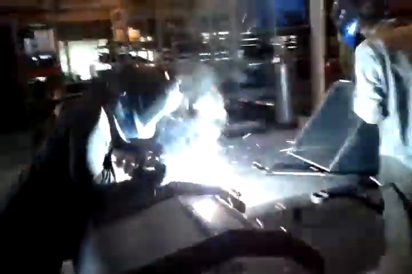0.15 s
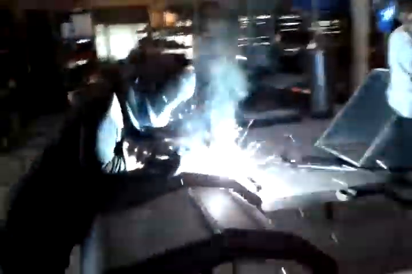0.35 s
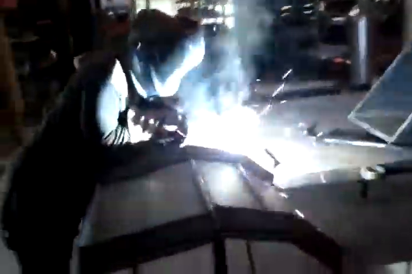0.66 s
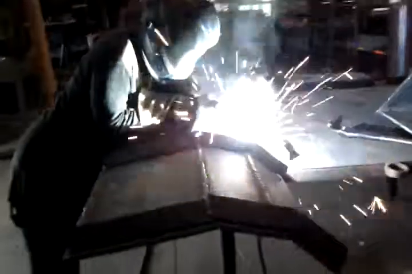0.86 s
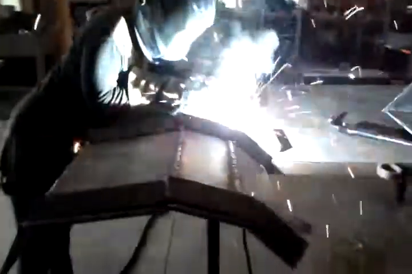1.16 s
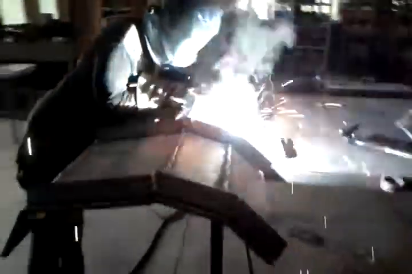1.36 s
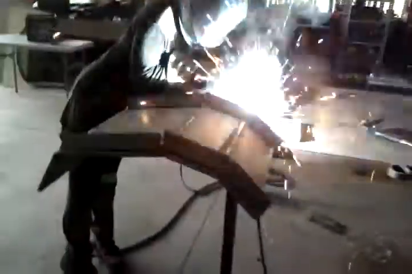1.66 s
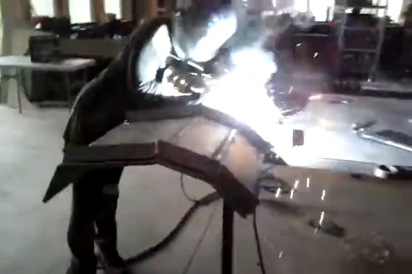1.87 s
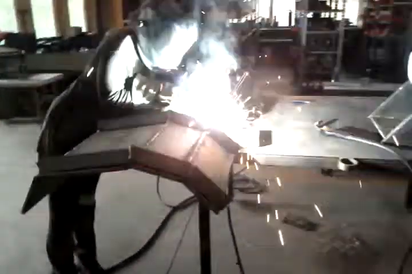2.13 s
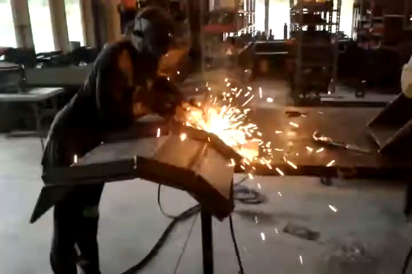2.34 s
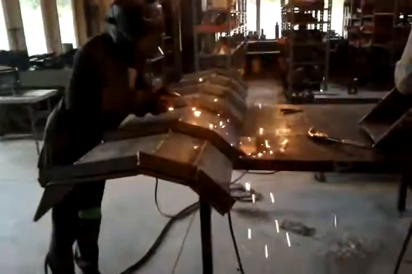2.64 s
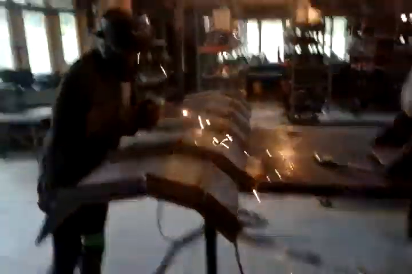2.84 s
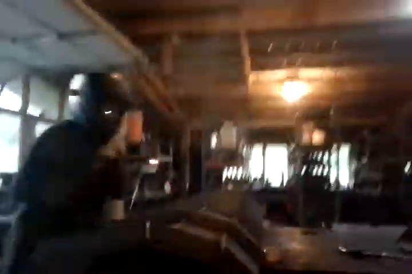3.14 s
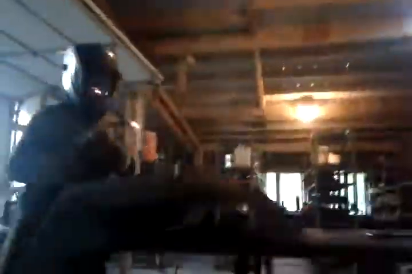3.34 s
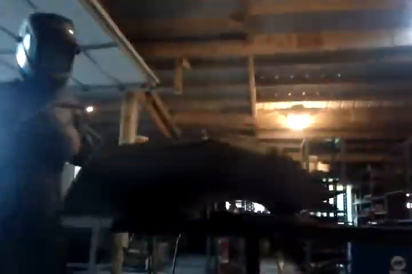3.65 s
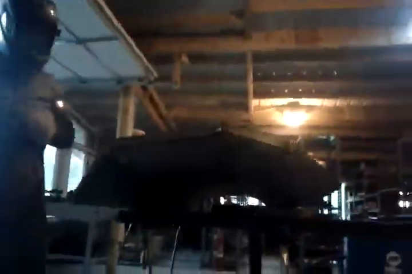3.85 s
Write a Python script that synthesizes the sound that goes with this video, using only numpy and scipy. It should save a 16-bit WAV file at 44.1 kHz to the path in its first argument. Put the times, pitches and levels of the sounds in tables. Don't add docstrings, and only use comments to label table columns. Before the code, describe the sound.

Electric arc welding crackles and pops harshly in a big workshop, then dies into faint hum

```python
import sys
import numpy as np
from scipy import signal
from scipy.io import wavfile
from scipy.ndimage import uniform_filter1d

SR = 44100
rng = np.random.default_rng(int(sys.argv[2]) if len(sys.argv) > 2 else 0)


def file_out(sig):
    cols = np.atleast_2d(sig).T
    lim = np.clip(cols, -1, 1)
    pcm = np.round(lim * 32767).astype(np.int16)
    wavfile.write(sys.argv[1], SR, pcm)


def level_to_linear(level):
    exponent = np.asarray(level, float) / 20
    return 10 ** exponent


N = 176400
EDGE_HZ = 6900
DIRECT_DB = -5


def burning(t):
    # start_s, length_s, start_level_db, end_level_db
    burns = [(-.5, 0.69, -11.5, -9), (.215, 0.05, -6, -12), (0.425, 0.058, -8, -15.5),
             (0.491, .03, -10, -12), (0.503, .047, -12.5, -11.5), (0.624, 0.019, -15, -12.5),
             (.733, 0.034, -11.5, -21.5), (0.791, 0.035, -42, -18), (0.842, 0.0094, -23, 4),
             (0.857, .04, -11.5, -14.5), (0.91, .13, -8.5, -10), (1.063, .22, -8, -8.5),
             (1.294, 0.092, -6.5, -11), (1.411, 0.02, -24, 6), (1.436, .19, -8, -10),
             (1.622, .195, -5, -11), (1.85, 0.21, -7.5, -10), (2.063, 0.04, -19, -7),
             (2.108, 0.065, -6.5, -13), (2.169, 0.054, -5.5, -10.5), (2.277, 0.016, -15, -13.5),
             (2.294, 0.027, -21.5, -36.5)]
    envelope = np.zeros(len(t))
    for start, length, db, end_db in burns:
        u = (t - start) / length
        spell = level_to_linear(db + (end_db - db) * np.clip(u, 0, 1)) * (u > 0) * (u < 1)
        envelope = np.maximum(envelope, spell)
    return envelope


def popping(t):
    # start_s, peak_db
    pops = [(0.2139, 5.5), (0.3471, -1), (0.3794, -6), (0.4181, 7), (0.479, -3.5), (0.6384, -7.5),
            (0.7342, -4.5), (0.8046, 2), (0.842, -4), (0.8575, 7), (0.9059, 6), (1.0494, 8.5),
            (1.2984, 2.5), (1.4064, 7), (1.441, -11), (1.455, -23), (2.2754, -11.5), (2.3069, 6.5)]
    gain_db, t60_s = -3, 0.018
    envelope = np.zeros(len(t))
    for start, db in pops:
        envelope += level_to_linear(db + gain_db - 60 * np.clip(t - start, 0, 1) / t60_s) * (t > start)
    return envelope


def arc_colour(dry):
    # frequency_hz, level_db (per Hz)
    arc_spectrum = [(18, -76), (30, -39.5), (516, -9.5), (619, -8), (813, -4.5), (1200, -5.5), (3910, 1),
                    (6300, 2.5), (6900, 0), (8970, -51.5), (15200, -120)]
    # frequency_hz, width_hz, level_db (the level is not used)
    plate_rings = [(887, 83, -7), (1640, 130, -3), (3850, 400, 0), (4650, 3900, 0)]
    ring_share = 0.36

    def response_db(hz):
        rings = sum(3.6 / (1 + ((hz - f) / (w / 2)) ** 2) for f, w, _ in plate_rings)
        return read(arc_spectrum, hz) + ring_share * rings

    return colour(dry, response_db)


def arc_body(dry, t):
    # time_s, body_db
    body = [(0, 0), (.22, -2), (.28, -4.5), (.55, -0.5), (.62, 1.5), (.83, 0), (.88, 4.5), (1.05, -1),
            (1.5, 0.5), (1.6, 2.5), (2.05, 1.5), (2.35, 3.5)]
    body_db = np.interp(t, *np.transpose(body))
    low = signal.sosfilt(signal.butter(2, 1370, fs=SR, output="sos"), dry)
    whistle = signal.lfilter(*signal.iirpeak(4700, 7.8, fs=SR), dry)
    varied = dry + (level_to_linear(body_db) - 1) * low + np.clip(-0.3 * body_db, 0, 3) * whistle
    drone = signal.lfilter(*signal.iirpeak(1776, 4.5, fs=SR), varied)
    return varied + np.clip(0.2044 * (body_db + 1.5), 0, 3) * drone


def arc():
    lead = 22050
    t = (np.arange(N + lead) - lead) / SR
    flutter_db, sparks_per_s, spark_spread_db = 0.5, 2500, 3
    stray_db, strays_per_s, out_s = -24.5, 90, 2.35
    flutter = uniform_filter1d(rng.standard_normal(len(t)), size=300)
    flutter = evened(uniform_filter1d(flutter, size=300))
    burn = uniform_filter1d(burning(t), size=60) * level_to_linear(flutter_db * flutter)
    drive = burn * sparks(len(t), sparks_per_s, spark_spread_db)
    drive = drive + popping(t) * sparks(len(t), 14000, 2.6)
    drive = drive + level_to_linear(stray_db) * (t < out_s) * sparks(len(t), strays_per_s, 2.7)
    dry = arc_body(arc_colour(drive), t)
    return (level_to_linear(DIRECT_DB) * dry + level_to_linear(-3.5) * hall(dry))[lead:]


def seam():
    # start_s, rise_s, hold_s, level_db
    fizzes = [
        (2.764, 0.043, 0.024, -33.5),
        (2.885, .008, .015, -34.5),
        (3.133, 0.00065, 0.0036, -30.5),
        (3.135, 0.0071, 0.042, -33),
        (3.227, .02, .08, -44.5),
        (3.545, 0.051, 0.12, -45.5),
        (3.747, 0.053, 0.048, -33),
    ]
    # frequency_hz, level_db (per Hz)
    fizz_spectrum = [(180, -21), (300, -8), (360, -22), (742, -17), (927, -10.5), (4300, -0.5), (6900, -5),
                     (8970, -36.5), (15200, -120)]
    hall_db, hall_lift_db = -12.5, 4
    t, shape = np.arange(N) / SR, np.zeros(N)
    for start, rise, hold, db in fizzes:
        fall_s = np.maximum(t - start - rise - hold, 0)
        shape += level_to_linear(db - 240 * fall_s) * np.clip((t - start) / rise, 0, 1) ** 2
    dry = colour(shape * sparks(N, 5000, 0.88), lambda hz: read(fizz_spectrum, hz))
    return level_to_linear(DIRECT_DB) * dry + level_to_linear(hall_db + hall_lift_db) * hall(dry, slower=1.22)


def hall(x, slower=1):
    # frequency_hz, t60_s
    reverberation = [(120, 1.7), (300, 1.58), (550, 0.93), (1040, 0.72), (1800, 0.82), (2600, 0.81),
                     (4000, 0.76), (6500, 0.6)]
    taps = np.zeros((8, SR))
    at = np.arange(200, SR - 20, 20) + rng.integers(0, 20, (8, (SR - 201) // 20))
    np.put_along_axis(taps, at, rng.choice([-1., 1.], at.shape), 1)
    hz, t, z = signal.stft(taps, SR, nperseg=256)
    decay = level_to_linear(-60 * t / slower / read(reverberation, hz)[:, None])
    tails = signal.istft(z * decay, SR, nperseg=256)[1]
    away = (np.arange(len(x)) * 9 / SR - np.arange(8)[:, None]) % 8 - 1
    feeds = x * np.cos(np.pi / 2 * np.clip(away, -1, 1))
    echoes = signal.fftconvolve(feeds, tails / np.linalg.norm(tails[0]), axes=1)
    return echoes[:, :len(x)].sum(0)


def room_air():
    # frequency_hz, level_db (per Hz)
    air_spectrum = [(18, -61), (30, -11.5), (70, -39), (112, -12), (177, -5.5), (249, -9), (932, -8.5),
                    (5250, -10), (6900, -11), (8970, -41), (15200, -120)]
    frames, hz = N // 256 + 5, np.fft.rfftfreq(1024, 1 / SR)
    a, b, patches = rng.standard_normal((frames, 513, 3)).T
    patches = uniform_filter1d(patches, size=10, axis=0)
    patches = evened(uniform_filter1d(patches, size=12, axis=1))
    gain = level_to_linear(read(air_spectrum, hz)[:, None] + 1.7 * patches) * (hz < EDGE_HZ)[:, None]
    noise = signal.istft((a + 1j * b) * gain, nperseg=1024, noverlap=768)[1][:N]
    return level_to_linear(-47) * evened(noise)


def mains_hum():
    # frequency_hz, level_db (rms)
    partials = [(120, -63), (240, -61), (360, -74)]
    t, hum = np.arange(N) / SR, np.zeros(N)
    for f, db in partials:
        waver = evened(uniform_filter1d(rng.standard_normal(N), size=5000))
        hum += level_to_linear(db + 3.5 + 0.5 * waver) * np.sin(2 * np.pi * f * t)
    return hum


def hands():
    # start_s, pitch_hz, level_db
    bumps = [
        (3.235, 60, -61),
        (3.405, 40.2, -73),
        (3.434, 102, -58),
        (3.458, 245, -68),
        (3.515, 670, -51),
        (3.558, 327, -53.5),
        (3.66, 640, -56),
        (3.968, 295, -59),
    ]
    t, out = np.arange(N) / SR, np.zeros(N)
    for start, hz, db in bumps:
        u = np.clip((t - start) * hz, 0, 50)
        out += level_to_linear(db + 19) * u / 0.85 * np.exp(-u / 0.92) * np.sin(2 * np.pi * u)
    return out


def sparks(count, per_s, spread_db):
    size_db = spread_db * np.minimum(rng.exponential(1, count), 4)
    size = level_to_linear(size_db) * rng.choice([-1., 1.], count)
    return evened(size * (rng.random(count) < per_s / SR))


def colour(x, db_of):
    db = np.maximum(db_of(np.abs(np.fft.fftfreq(8192, 1 / SR))), -100)
    log_gain = db * np.log(10) / 20
    taps = np.fft.ifft(np.exp(np.conj(signal.hilbert(log_gain)))).real[:4096]
    return signal.oaconvolve(x, taps / np.linalg.norm(taps))[:len(x)]


def read(points, hz):
    f, value = np.transpose(points)
    return np.interp(np.log(hz + 1), np.log(f + 1), value)


def evened(x):
    return x / np.sqrt(np.mean(x ** 2) + 1e-20)


def dropouts(x, share_of, size):
    hz, t, z = signal.stft(x, SR, nperseg=size, noverlap=size * 3 // 4)
    band, lag = np.arange(len(hz)) // 5, rng.integers(0, 7, len(hz))
    spell = (np.arange(len(t)) + lag[band][:, None]) // 7
    luck = rng.random((len(t), len(hz)))[spell, band[:, None]]
    heard = z * (luck > share_of(hz[:, None], t))
    return signal.istft(heard, SR, nperseg=size, noverlap=size * 3 // 4)[1][:, :N]


def scene():
    return (arc() + seam() + room_air() + mains_hum())[None]


def top_cut(x):
    return signal.sosfilt(signal.butter(12, 15830, fs=SR, output="sos"), x)


def record(dry):
    overload, knee, clip = 0.72, 3.14, 0.708
    dry = signal.sosfilt(signal.butter(3, 114, "high", fs=SR, output="sos"), dry)
    dry = overload * np.tanh(np.abs(dry / overload) ** knee) ** (1 / knee) * np.sign(dry)
    low_pass = signal.firwin(1023, EDGE_HZ, window=("kaiser", 10), fs=SR)
    dull = signal.oaconvolve(dry, low_pass[None], "same")

    def middle_share(hz, t):
        return 0.15 * np.exp(-((hz - 2200) / 700) ** 2)

    def starved_share(hz, t):
        return 0.22 * (hz > 2300) * (t > 3.075) * (t < 3.118)

    dull = dropouts(dull, middle_share, size=4096)
    dull = dropouts(dull, starved_share, size=1024)
    return top_cut(np.clip(dull + hands(), -clip, clip))


dry = scene()
out = record(dry)
file_out(out)
```